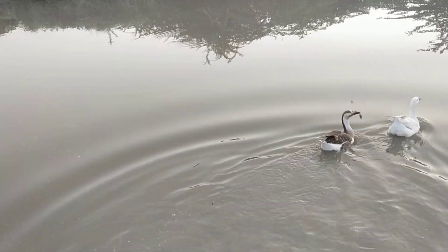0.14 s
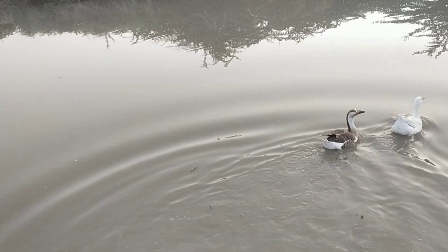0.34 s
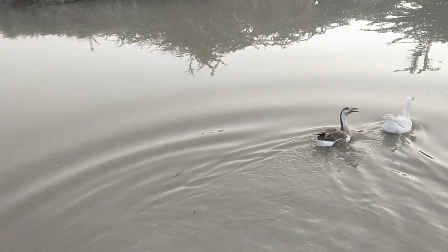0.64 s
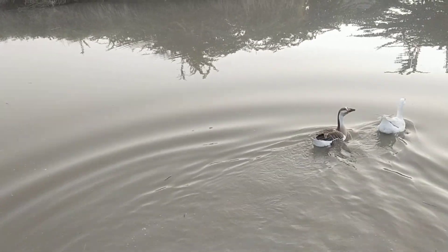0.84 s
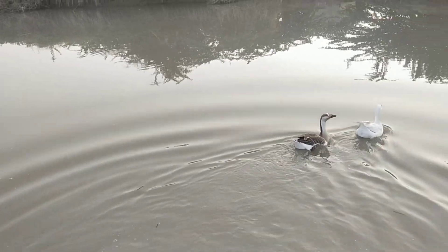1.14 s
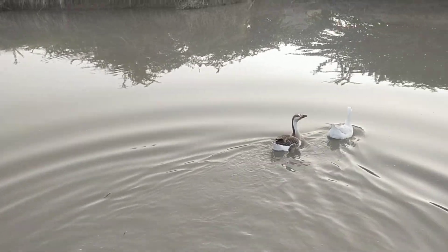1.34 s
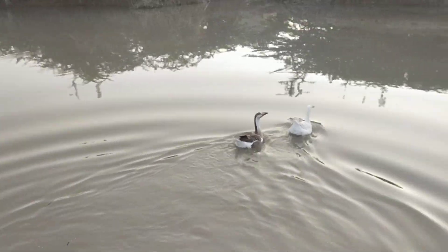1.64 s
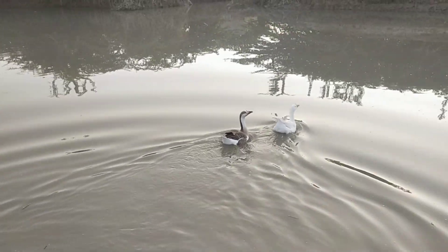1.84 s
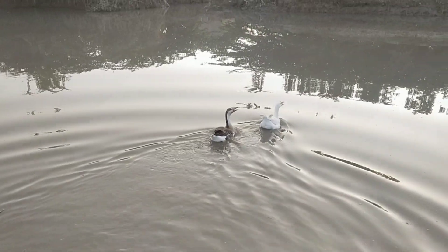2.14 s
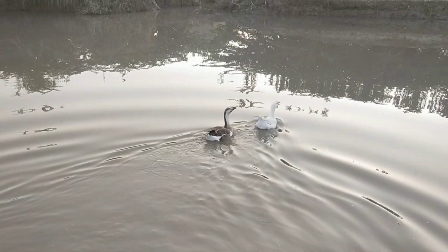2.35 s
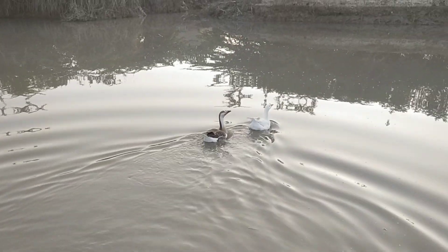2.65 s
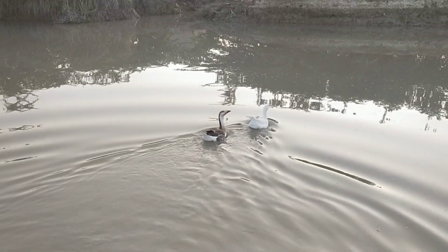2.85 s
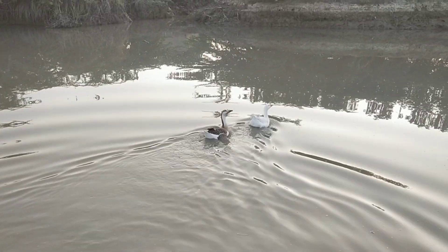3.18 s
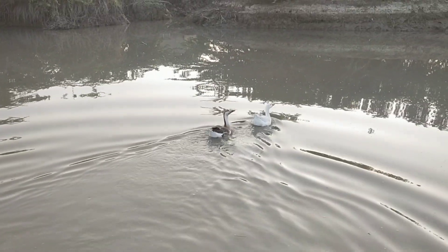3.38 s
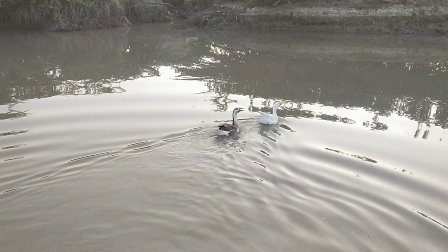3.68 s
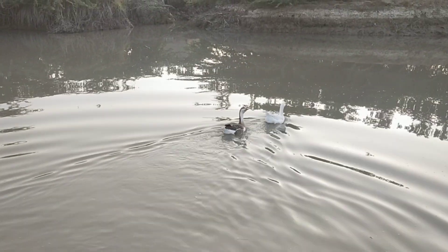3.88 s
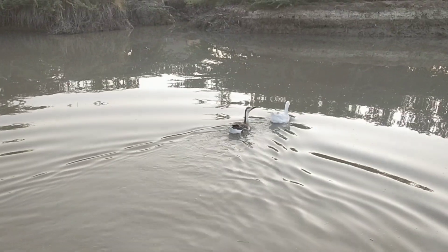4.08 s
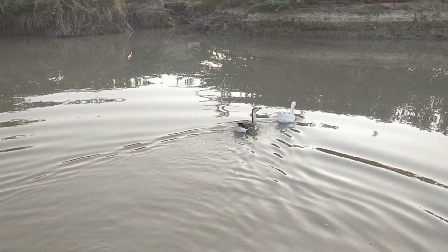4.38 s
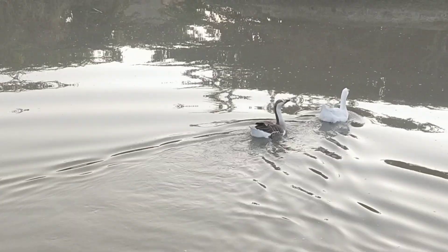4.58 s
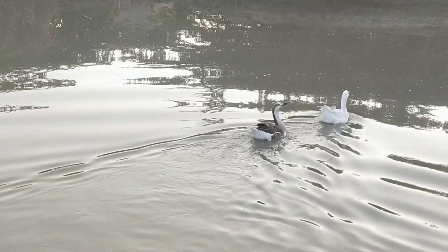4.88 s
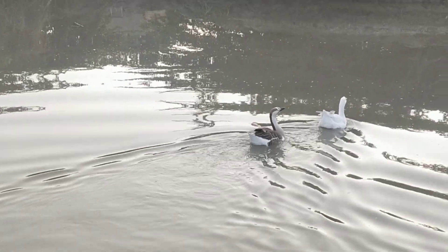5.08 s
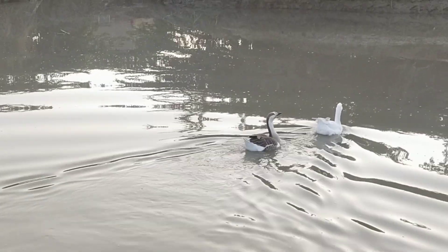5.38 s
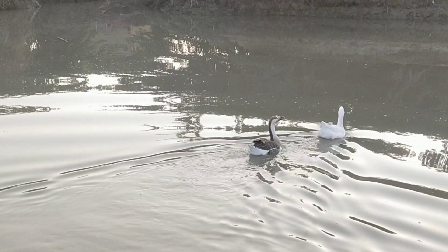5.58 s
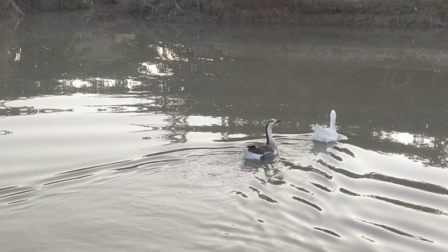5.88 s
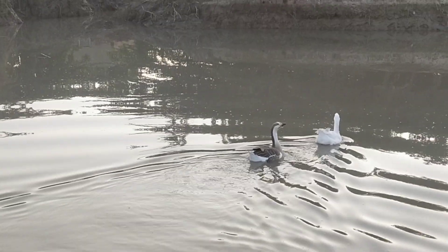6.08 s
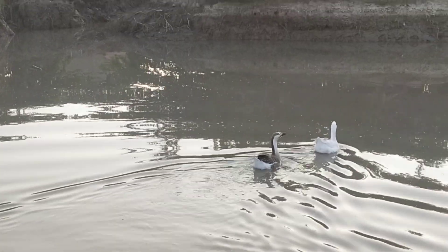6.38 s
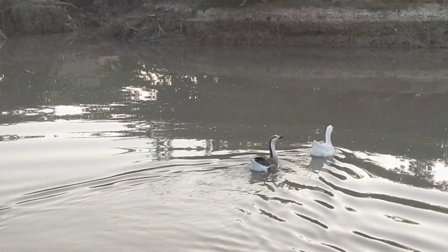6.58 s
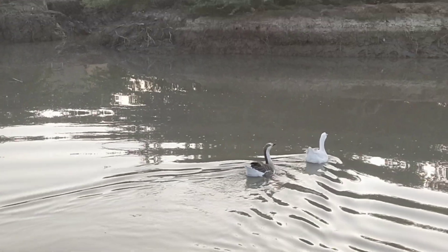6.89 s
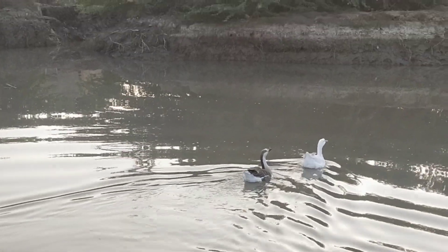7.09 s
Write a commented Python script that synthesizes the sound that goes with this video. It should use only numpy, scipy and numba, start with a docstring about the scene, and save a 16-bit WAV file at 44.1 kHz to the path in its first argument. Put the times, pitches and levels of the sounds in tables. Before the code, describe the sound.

A goose honks hoarsely while another cries high and clear, repeating every second and a half over soft open-air hush and a distant chugging engine.

```python
"""Over steady air hush and a far engine's chug, small birds chirp and a drip sounds; then two geese call together.
One honks low: its syrinx slaps shut each cycle and rings throat and bill; grunts follow. The other's clear harmonic
cry breaks upward, then sighs. Thin sliding tones follow: first a cry's faint echo, then far-off ones. Soft knocks
fall now and then; a hiss grows and stops, noise bursts crackle, light taps come after; a far whine trills at the end.
Banks and trees echo the geese and, more softly, the near sounds; the right microphone is shaded and duller."""
import sys
import numpy as np
from scipy import signal
from scipy.fft import rfft, irfft
from scipy.io import wavfile
from scipy.ndimage import uniform_filter1d, map_coordinates
from numba import njit

SR = 44100
rng = np.random.default_rng(int(sys.argv[2]) if len(sys.argv) > 2 else 0)


def to_wav(sig):
    """Store sig (one row per channel, or 1-D mono) as 16-bit WAV at the path in sys.argv[1].

    Samples outside -1..1 are clipped; the rate is SR.
    """
    pcm = np.clip(np.atleast_2d(sig), -1, 1) * 32767
    pcm = np.round(pcm).astype(np.int16)
    wavfile.write(sys.argv[1], SR, pcm.T)  # frames by channels


N = 318843
T = np.arange(N) / SR

# open-air hush, relative spectrum: f/Hz, level/dB
AIR_SPECTRUM = [(15, -53.5), (25, -12.5), (111, -0.5), (242, -2.5), (293, -9), (863, -20), (1160, -18.5),
                (1560, -25.5), (2690, -27), (6210, -37.5), (8140, -44), (12900, -38), (16000, -48.5)]
# how much weaker the right microphone hears the pond: f/Hz, level/dB
RIGHT_SHADE = [(150, 1), (600, 4.5), (1000, 8), (1400, 12), (1950, 11.5), (2500, 13.5), (3200, 24),
               (4200, 30.5), (6500, 32), (14000, 25)]
# how far the left microphone leads in phase: f/Hz, phase/rad
LEFT_LEAD = [(20, -3.5), (170, -0.43), (690, 2.09), (1460, 0.78), (2240, 2.5), (3500, -0.5), (16000, 12.5)]
# smeared echoes from the banks: delay/s, level/dB
BANK_ECHOES = [(0.021, -11.5), (.083, -21), (.2, -32)]
# exhaust resonances of the far engine: f/Hz, width/Hz, level/dB
ENGINE_MODES = [(83.5, 11, -4), (113, 73, -5), (114, 65, -11), (216, 25, -17), (412.4, 18, -10.5),
                (452.8, 44, -13)]
# thin tones, first a cry's faint echo, then far-off ones:
# t/s, swell/s, fade/s, start f/Hz, end f/Hz, peak level/dB
THIN_TONES = [(1.189, 0.07, .24, 1125, 1080, -54.5), (2.92, 1, .88, 912, 862, -70.5),
              (4.719, 0.052, 0.29, 1294, 1350, -78), (4.849, 0.095, 0.32, 2715, 2710, -85.5),
              (6.76, 0.16, 0.35, 2730, 2517, -78), (6.8, 0.16, .45, 4060, 3800, -88.5),
              (6.92, 0.19, 0.44, 4600, 4430, -89), (6.919, .17, 0.5, 7300, 7000, -89)]
# small birds: t/s, length/s, start f/Hz, middle f/Hz, end f/Hz, level/dB
CHIRPS = [(0.218, 0.031, 5300, 4930, 4630, -73), (0.268, 0.056, 5500, 6300, 5100, -82),
          (0.317, 0.044, 6450, 5950, 4800, -79.5), (1.58, 0.037, 5200, 5460, 4960, -81),
          (1.618, 0.028, 5230, 5860, 4740, -79), (1.64, 0.11, 4680, 3740, 4030, -75.5),
          (1.858, 0.19, 6050, 5100, 5340, -88), (4.583, 0.15, 5140, 5300, 5200, -79.5)]
# thin hisses that grow and stop short: t/s, length/s, end level/dB, growth/dB
HISSES = [(2.647, 0.776, -74.5, 5.5)]
# bands of the hiss: f/Hz, width/Hz, level/dB
HISS_BANDS = [(6900, 1200, 8), (12070, 3700, 11)]
# noise bursts (sharp close crackles; soft knocks and plops; narrow, bright drips):
# t/s, peak level/dB, centre f/Hz, t60/s
CRACKLES = [(3.421, -40, 8000, .012), (3.428, -23.5, 7200, .007), (3.4315, -34, 6500, .02),
            (3.437, -32, 6000, .022), (3.446, -21, 6500, .008), (3.4525, -29.5, 5500, .03),
            (3.458, -35, 11000, .04), (3.4897, -46, 3500, .02), (3.499, -47, 3200, .015),
            (6.092, -49, 4000, .012)]
KNOCKS = [(1.743, -54, 1128, 0.025), (5.867, -40.5, 487, 0.059), (6.104, -40, 360, 0.053),
          (6.537, -47, 94, 0.13)]
DRIPS = [(.046, -52, 3650, 0.02), (1.256, -42, 3800, 0.038)]
# light taps: t/s, peak level/dB
TAPS = [(4.7, -43.5), (4.708, -48.5), (4.747, -45.5)]
# ringing of the small hollow thing tapped: f/Hz, t60/s, level/dB
TAP_MODES = [(1308, 0.066, 3), (2485, 0.033, -4), (3130, .016, 2), (3470, 0.02, -0.5), (4600, .018, -6)]
# fixed resonances of the crying throat: f/Hz, level/dB
CRY_THROAT = [(400, -7), (620, 8.5), (950, -5), (1350, 4), (1900, -6.5), (2400, -4.5), (2700, -11),
              (2900, 0.5), (3150, -5), (3400, -11), (3900, -7), (4500, -28), (6600, -32.5), (8000, -26)]
# the voice dropping back to a soft low note: t/s, length/s, crest f/Hz, level/dB, brightness/dB
SIGHS = [(0.976, 0.25, 680.5, -40, 0.5), (2.379, 0.23, 655.7, -45.5, -12.5),
         (4.087, 0.245, 682.3, -42.5, -3)]
# cries: t/s, low part/s, high part/s, time from break to crest/s, low f/Hz, crest f/Hz, fall/(Hz/s),
# low level/dB, crest level/dB, fade/(dB/s), low brightness/dB, high brightness/dB, roughness/0-1,
# bill resonance f/Hz, its boost/dB, cycles per strong beat
CRIES = [ (.69, 0.1, 0.196, .058, 599.6, 982, 1400, -41, -27, 190, 13, 11, 0.01, 3920, 8, 3),
         (2.125, 0.1, 0.22, 0.047, 602.3, 941, 883, -42, -38.5, 85, 7, 8, 0.07, 2860, 2, 3),
         (3.803, 0.08, 0.228, 0.072, 587.5, 981, 1199, -37, -41, 11, 5, -4, 0.13, 2910, 5.5, 3),
         (5.369, .082, 0.33, 0.072, 601.3, 889, 498, -45, -43, 29, 2.5, 7.5, 0.7, 1740, 8, 2),
         (6.096, 0.092, 0.14, 0.029, 567.6, 948, 1295, -37, -34.5, 104, 2.5, 13.5, 0.39, 2000, 14, 3)]
# resonances of the honking throat (the first is the chest): f/Hz, width/Hz, level/dB
THROAT = [(174, 70, -13), (591, 150, -13), (970, 170, -20), (1773, 570, -8.5)]
# bill resonances that stay put (the last carries the rush of air): f/Hz, width/Hz, level/dB
BILL = [(3797, 720, 0.5), (6456, 480, -4.5), (12560, 9000, -16)]
# soft grunts, a slowing creak, and a rough, grainy tail like the last cry's echo:
# t/s, length/s, level/dB, start pitch f/Hz, end pitch f/Hz,
# main resonance f/Hz, brightness/dB, roughness/0-1, shudder/0-1
GRUNTS = [ (0.916, 0.044, -36, 220.8, 222.8, 2010, -14, 0.24, 0.34),
          (0.978, 0.054, -37.5, 219, 223, 1260, -10.5, 0.15, 0.5),
          (2.39, 0.13, -43.5, 214.7, 210.8, 1220, -5.5, 0.41, 0),
          (2.515, 0.081, -52, 218.3, 209, 1050, -9, 0.77, 0),
          (4.023, 0.044, -40.5, 209, 218.5, 2150, -15, 0.48, .3),
          (4.066, 0.058, -42.5, 216.5, 217, 1450, -16, 0.2, 0.1),
          (4.11, 0.075, -39.5, 220.5, 224.2, 1185, -10, 0.27, 0.34),
          (5.363, 0.1, -50, 204.7, 208.4, 1235, -3, 0.31, 0),
          (5.498, 0.097, -51.5, 218.7, 222, 1770, -9, 0.48, 0.1),
          (5.741, .14, -42, 142.2, 117.9, 1320, -8, 0.38, 0.26),
          (5.866, 0.088, -46, 106.7, 95.4, 1254, -8.5, 0.58, 0.36),
          (6.139, .075, -46, 196.6, 206.5, 1750, 1.5, 0.58, 0.4),
          (6.333, 0.0488, -56, 228, 207, 1680, 1.5, 0.65, 0.1),
          (6.383, 0.06, -47.5, 223.9, 211.7, 1000, -4.5, 0.54, 0.15),
          (6.435, 0.065, -50, 223.6, 212.4, 874, -7.5, 0.31, 0)]
# honks: t/s, length/s, release/s, level/dB, swell/dB, main resonance start f/Hz, end f/Hz, its sag/Hz,
# upper resonance start f/Hz, end f/Hz, time to its drop/s, its ring after the drop/dB,
# brightness start/dB, end/dB, roughness start/0-1, end/0-1, closing snap/dB,
# lowest bill resonance f/Hz, its boost/dB, top bill resonance f/Hz, its level/dB,
# low gap start f/Hz, end f/Hz, high gap f/Hz
HONKS = [ (0.514, 0.346, 0.007, -27, 8.5, 1370, 1360, 20, 4200, 3320, 0.27, -19.5, -2, -8.5, 0.65, 0.2, 7, 2640, 4.5, 5750, -8, 2280, 2400, 3720),
         (2.053, 0.316, 0.018, -29, 7, 1490, 1402, 90, 3500, 3380, .235, -4.5, -7, -8, 0.85, 0.14, 8, 2800, 1, 4400, -2, 2520, 2450, 4020),
         (3.66, 0.31, 0.007, -32, 6, 1720, 1550, 215, 3840, 3430, 0.225, -5, -.5, -4.5, 0.68, 0.36, 10.5, 2440, 1.5, 5240, -4.5, 2910, 2530, 5635),
         (5.586, 0.11, 0.15, -30.5, -10, 1390, 1554, -100, 3930, 4230, 0.06, -26.5, -3.5, -8, 0.83, 0.37, 2, 2355, 3, 6520, -4, 3040, 3120, 5480)]
# one pitch curve per honk, timed from the start of the scene: t/s, f/Hz
HONK_PITCH = [
    [(0.54, 145), (0.596, 155.5), (0.668, 149), (0.724, 157), (0.798, 156.2), (0.826, 162.6), (0.85, 157.3)],
    [(2.08, 170.7), (2.11, 175.3), (2.136, 152), (2.166, 151), (2.284, 162.9), (2.3, 173.1), (2.36, 176.1)],
    [(3.69, 167.5), (3.718, 174.1), (3.742, 153.4), (3.78, 150.5), (3.856, 159.3), (3.882, 173.6),
     (3.96, 178.2)],
    [(5.6, 141.7), (5.65, 153), (5.682, 154.3), (5.72, 142.4)],
]

TOP_HZ = 15850


def undb(db):
    """Decibels to gain."""
    return 10 ** (np.asarray(db) / 20)


def unit(x):
    """Scale to rms 1."""
    return x / np.sqrt(np.mean(x ** 2) + 1e-20)


def steady(x, size=900):
    """Hold the running rms near 1; size is the averaging length in samples."""
    power = uniform_filter1d(uniform_filter1d(x ** 2, size), size)
    return x / np.sqrt(np.abs(power) + 1e-14)


def spectrum_gain(points, hz):
    """Gain of a (f/Hz, level/dB) spectrum at any frequency."""
    f, db = np.transpose(points)
    return undb(np.interp(np.log(hz + 1), np.log(f), db))


def colour(x, points):
    """Filter by a (f/Hz, level/dB) spectrum."""
    gain = spectrum_gain(points, np.fft.rfftfreq(len(x), 1 / SR))
    return irfft(rfft(x) * gain, len(x))


@njit
def svf(x, hz, width):
    """State-variable band-pass whose centre and width may move."""
    y, band, low = np.empty(len(x)), 0., 0.
    for i in range(len(x)):
        g, k = np.tan(np.pi * hz[i] / SR), width[i] / hz[i]
        v = (band + g * (x[i] + 1e-18 - low)) / (1 + g * (g + k))
        band, low, y[i] = 2 * v - band, low + 2 * g * v, k * v
    return y


def resonate(x, hz, width):
    """A resonance with steep skirts: two equal band-passes in a row."""
    every = np.ones(len(x))
    centre = np.minimum(hz * every, TOP_HZ)
    return svf(svf(x, centre, width * every), centre, width * every)


def body(x, modes):
    """Several (f/Hz, width/Hz, level/dB) resonances side by side."""
    return sum(undb(db) * resonate(x, hz, width) for hz, width, db in modes)


def walk(n, rate):
    """Smooth random wander with spread near 1, taking rate new values a second."""
    values = rng.standard_normal(16000)
    return 1.2 * np.interp(np.arange(n) / SR * rate, np.arange(16000), values)


def clock(length):
    """Seconds since the start of a sound."""
    return np.arange(int(length * SR)) / SR


def envelope(t, attack_s, release_s):
    """Rise, hold and release."""
    rise = np.sin(np.pi / 2 * np.clip(t / attack_s, 0, 1)) ** 2
    return rise * np.clip((t[-1] - t) / release_s, 0, 1)


def glide(start, end, u):
    """Move from start to end as u goes from 0 to 1."""
    return start + (end - start) * u


def from_crest(t, crest_s, round_s=0.03):
    """Seconds away from the crest of a note, which turns over gently."""
    return np.hypot(t - crest_s, round_s) - round_s


def add(out, s, x):
    """Mix a sound in at its time."""
    i = int(s * SR)
    out[i:i + len(x)] += x[:max(N - i, 0)]


def play(sound, events):
    """Play one sound for each row of an event table."""
    out = np.zeros(N)
    for s, *row in events:
        add(out, s, sound(*row))
    return out


def air(level_db=-64.5, right_db=-4, swell_db=0.23):
    """Open-air hush: the bass is shared, the treble differs at the two microphones."""
    shared = colour(rng.standard_normal(N), [(200, -12.5), (900, -17), (3000, -28.5)])
    sides = []
    for side_db in (0, right_db):
        own = colour(rng.standard_normal(N), [(150, -17.5), (900, -1), (3000, 0.5)])
        sides.append(undb(side_db) * unit(colour(shared + own, AIR_SPECTRUM)))
    return np.array(sides) * undb(level_db + swell_db * walk(N, 2.8))


def microphones(left, right):
    """The right microphone is shaded and shifted in phase; the split is scaled by its mean magnitude."""
    hz = np.fft.rfftfreq(N, 1 / SR)
    lead_hz, radians = np.transpose(LEFT_LEAD)
    ratio = spectrum_gain(RIGHT_SHADE, hz)
    late = np.exp(-1j * np.interp(hz, lead_hz, radians))
    both = np.abs(ratio + late) / 2
    return np.array([irfft(rfft(left) * ratio / both, N), irfft(rfft(right) * late / both, N)])


def banks(x, t60=0.94, treble_t60=1.15, tail_db=-15.0, smear_s=0.0075):
    """The banks throw back a few smeared echoes; the trees scatter a thin tail whose pitch blurs."""
    t = T[:SR]
    low = colour(rng.standard_normal(SR), [(2000, 2), (5000, -15.5)])
    high = colour(rng.standard_normal(SR), [(1700, -30.0), (4000, 3.0)])
    low = low * np.exp(-np.log(1000) * t / t60)
    high = high * np.exp(-np.log(1000) * t / treble_t60)
    scatter = undb(tail_db) * unit((low + high) * np.minimum(t / 0.004, 1))
    echoes = np.zeros(SR)
    for delay, db in BANK_ECHOES:
        smear = (t > delay) * np.exp(-np.abs(t - delay) / smear_s)
        echoes += undb(db) * unit(smear * rng.standard_normal(SR))
    early, tail = (signal.fftconvolve(x, response / np.sqrt(SR))[:N] for response in (echoes, scatter))
    # the scattered paths keep changing length
    blur_s = 0.00022 * walk(N, 170)
    return early + map_coordinates(tail, [(T + blur_s) * SR], order=3, mode="nearest")


def engine(firing_hz=21.15, level_db=-63, unevenness=0.1, scatter_db=3, rumble=1.0):
    """Slow, uneven firings of a far engine; only the low exhaust resonances carry."""
    turns = np.floor(np.cumsum(firing_hz * (1 + unevenness * walk(N, 18))) / SR)
    firings = unit(np.diff(turns, prepend=0) * undb(scatter_db * walk(N, 58)))
    return undb(level_db) * unit(body(firings + rumble * rng.standard_normal(N), ENGINE_MODES))


def thin_tone(t, hz, db, waver=0.012, unsteady=1):
    """A thin tone made unsteady in pitch and level by the air on its way."""
    phase = 2 * np.pi * np.cumsum(hz * (1 + waver * walk(len(t), 90))) / SR
    flicker_db = 3.5 * unsteady * walk(len(t), 28)
    return undb(db + flicker_db) * np.sqrt(2) * np.sin(phase)


def drifting_tone(swell_s, fade_s, hz0, hz1, db, swell_db=4.5, waver_hz=14):
    """A thin tone swells and fades as it slides in pitch."""
    t = clock(swell_s + fade_s)
    away = np.maximum(1 - t / swell_s, (t - swell_s) / fade_s)
    tone = thin_tone(t, glide(hz0, hz1, t / t[-1]), db - swell_db * away, waver=waver_hz / hz0)
    return envelope(t, attack_s=0.013, release_s=fade_s / 2) * tone


def whine(start_s=6.58, trill_hz=91, depth=0.7):
    """A far tone, chopped by a fast trill, scoops up, then sags and fades."""
    rise_s, scoop_hz, sag_hz_per_s, fade_db_per_s = 0.17, 165, 180, 12
    t = np.maximum(T - start_s, 0)
    hz = 1681 - scoop_hz * np.exp(-t / rise_s) - sag_hz_per_s * t
    tone = thin_tone(t, hz, -58 - fade_db_per_s * t, waver=0.006, unsteady=0.36)
    trill = 1 + depth * np.cos(2 * np.pi * trill_hz * t)
    return np.sqrt(np.minimum(t / rise_s, 1)) * tone * trill


def chirp(length, start_hz, middle_hz, end_hz, db, raspiness=0.6):
    """A small bird's faint whistle curves through three pitches."""
    t = clock(length)
    curve = np.polyfit([-1, 0, 1], [start_hz, middle_hz, end_hz], 2)
    whistle = thin_tone(t, np.polyval(curve, 2 * t / length - 1), db, waver=0.0107)
    return envelope(t, attack_s=0.006, release_s=0.0028) * whistle * (1 + raspiness * walk(len(t), 500))


def hiss(length, db, growth_db):
    """A thin, high band of noise grows and stops short."""
    t = clock(length)
    noise = unit(body(rng.standard_normal(len(t)), HISS_BANDS))
    return envelope(t, attack_s=0.04, release_s=0.017) * undb(db + growth_db * (t / length - 1.0)) * noise


def bursts(events, spread):
    """Short decaying bursts of noise, each in its own band; spread is bandwidth over centre."""
    out, t = np.zeros(N), T[:SR // 6]
    for s, db, hz, t60 in events:
        decaying = rng.standard_normal(len(t)) * np.exp(-np.log(1000) * t / t60)
        x = resonate(decaying, hz, spread * hz)
        add(out, s, undb(db) * x / np.abs(x).max())
    return out


def tap(db):
    """A light tap on something small and hollow: a few decaying modes."""
    t = clock(.15)
    ring = sum(undb(mode_db - 60 * t / t60) * np.sin(2 * np.pi * hz * t) for hz, t60, mode_db in TAP_MODES)
    return undb(db) * ring / np.abs(ring).max()


def clear_voice(t, hz, db, bright_db, rough, ring_hz, ring_db, beat_cycles=3,
                jitter=0.0055, flutter=0.61, hiss_db=-16, count=7):
    """A clear harmonic tone; roughness makes every second or third cycle beat, adding lines between harmonics."""
    n = len(t)
    phase = 2 * np.pi * np.cumsum(hz * (1 + jitter * (1 + rough) * walk(n, 400))) / SR
    tone = np.zeros(n)
    for k in range(1, count + 1):
        # brightness grows from 700 Hz to its full amount two octaves up
        push = undb(bright_db * np.clip(np.log(k * hz / 700) / np.log(4), 0, 1))
        shiver = undb(1.2 * np.sqrt(k) * walk(n, 70))
        ring = undb(ring_db * np.exp(-((k * hz - ring_hz) / 260) ** 2))  # the bill
        tone += spectrum_gain(CRY_THROAT, k * hz) * ring * push * shiver * np.sin(k * phase)
    beat = 1 + flutter * rough * (np.cos(phase / beat_cycles) + 0.35 * walk(n, 500))
    breath = unit(body(colour(rng.standard_normal(n), [(4000, -8.0), (12000, -10)]), BILL))
    breath = breath * undb(hiss_db + bright_db / 2) * np.sqrt(np.abs(rough))
    return undb(db) * steady(steady(tone) * beat + breath)


def sigh(length, crest_hz, db, bright_db):
    """A soft, flat arch of the clear voice in its low register; the bill picks out one overtone."""
    fall_hz_per_s, fade_db_per_s = 580, 116
    t = clock(length)
    away = from_crest(t, crest_s=0.088)
    voice = clear_voice(t, crest_hz - fall_hz_per_s * away, db - fade_db_per_s * away, bright_db,
                        rough=0.16, ring_hz=3396, ring_db=12.5)
    return envelope(t, attack_s=0.035, release_s=0.02) * voice


def cry(low_s, high_s, crest_s, low_hz, crest_hz, fall, low_db, crest_db, fade,
        low_bright, high_bright, rough, ring_hz, ring_db, beat_cycles):
    """A climbing low note breaks up by about a fifth; pitch and level then arch over together."""
    climb_hz_per_s, break_s = 580, 0.0035
    t = clock(low_s + high_s)
    broken = .5 + .5 * np.tanh((t - low_s) / break_s)
    # the voice rasps where it breaks and roughens as it runs out
    crack = 0.3 * np.exp(-((t - low_s) / 0.003) ** 2)
    fray = 0.25 * np.clip(2 * (t - low_s) / high_s - 1, 0, 1)
    away = from_crest(t, low_s + crest_s)
    hz = glide(low_hz + climb_hz_per_s * t, crest_hz - fall * away, broken)
    db = glide(low_db, crest_db - fade * away, broken)
    bright_db = glide(low_bright, high_bright, broken)
    voice = clear_voice(t, hz, db, bright_db, rough + crack + fray, ring_hz, ring_db, beat_cycles)
    return envelope(t, attack_s=0.055, release_s=0.013) * voice


def gap(x, hz, width_hz=440, depth=0.62):
    """A side cavity of the throat swallows one band."""
    every = np.ones(len(x))
    for _ in range(2):
        x = x - depth * svf(x, hz * every, width_hz * every)
    return x


def rasp(t, hz, db, main_hz, bright_db, upper_hz, rough, gaps_hz, ring=0, bill_hz=2500, bill_db=0,
         top_hz=5500, top_db=-12, clear_width_hz=100, rough_width_hz=620, upper_width_hz=900, top_width_hz=500):
    """The syrinx slaps shut once a cycle and a puff of air follows; both ring the throat and the bill."""
    jitter, shimmer_db, low_rasp, high_rasp, open_share = .036, 2.6, .9, 1.9, .42
    n = len(t)
    cycles = np.cumsum(hz * (1 + jitter * rough * walk(n, 170.64))) / SR
    offset = ((cycles + .5) % 1 - .5) * SR / hz  # samples from the nearest slap
    pulses = np.sinc(offset) * np.exp(-(offset / 6) ** 2)
    slaps = unit(pulses * undb(shimmer_db * rough * walk(n, 170)))
    puffs = rough * unit(np.exp(-(cycles % 1) / open_share) * rng.standard_normal(n))
    soft = slaps + low_rasp * puffs
    # each slap rattles along the windpipe, which smears it and makes the overtones uneven
    windpipe = rng.standard_normal(SR // 100) * np.exp(-T[:SR // 100] / .0022)
    rattle = unit(signal.fftconvolve(slaps, windpipe)[:n])
    # the top is mostly rushing air
    harsh = colour(rattle, [(4000, 7.0), (8000, -12.0)]) + high_rasp * puffs
    # a leaky, rough syrinx damps the resonances; a tight one lets them ring narrow and tall
    width = clear_width_hz + rough_width_hz * rough
    upper_width = clear_width_hz + upper_width_hz * rough
    tall = 450 / width
    # the resonances wander a little
    main_hz, upper_hz, bill_hz = (f * (1 + 0.014 * walk(n, 120)) for f in (main_hz, upper_hz, bill_hz))
    throat = tall * resonate(soft, main_hz, width)
    throat = throat + body(rattle + low_rasp * puffs, THROAT[1:]) + body(slaps, THROAT[:1])
    bill = tall * resonate(harsh, upper_hz, upper_width) + body(harsh, BILL[:-1])
    bill = bill + undb(3.5 + bill_db) * resonate(harsh, bill_hz, 270)
    bill = bill + undb(top_db) * resonate(harsh, top_hz, top_width_hz)
    # the louder the call, the more air rushes through the bill
    rush = undb(0.86 * (db + 32.5)) * body(harsh, BILL[-1:])
    squeal = ring * steady(resonate(soft, upper_hz, 180))
    for gap_hz in gaps_hz:
        throat, bill = gap(throat, gap_hz), gap(bill, gap_hz)
    return undb(db) * (steady(throat) + undb(bright_db) * steady(bill + rush) + squeal)


def grunt(length, db, hz0, hz1, main_hz, bright_db, rough, shudder):
    """One short, rounded stretch of the rasping voice; a slack syrinx shudders in coarse pulses."""
    t = clock(length)
    u = t / length
    shudder_hz = 44.5 * (1 + .2 * walk(len(t), 40))
    pulsing = 1 + shudder * np.cos(2 * np.pi * np.cumsum(shudder_hz) / SR)
    voice = rasp(t, glide(hz0, hz1, u), db, main_hz, bright_db, upper_hz=3450, rough=rough, gaps_hz=[2800])
    return np.sin(np.pi * u) ** 0.97 * pulsing * voice


def honk(pitch, length, release, db, swell_db, main0, main1, sag_hz, upper0, upper1, drop_s, ring_db,
         bright0, bright1, rough0, rough1, snap_db, bill_hz, bill_db, top_hz, top_db, gap0, gap1, high_gap_hz):
    """A honk's level and roughness shift as the goose pushes; resonances and gaps slide, and it snaps shut."""
    clearing_s, upper_drop_s, snap_s = 0.1, 0.012, 0.012
    t = clock(length + release)
    u = np.minimum(t / length, 1)
    closing = np.sin(np.pi * u)
    # the bill half closes in mid-call, which dulls it by 2 dB; the end is a harsh snap
    snap = snap_db * np.exp(-((t - length) / snap_s) ** 2)
    bright_db = glide(bright0, bright1, u) - 2 * closing + snap
    dropped = .5 + .5 * np.tanh((t - drop_s) / upper_drop_s)
    rough = glide(rough1, rough0, np.exp(-t / clearing_s))
    main_hz = glide(main0, main1, u) - sag_hz * closing
    gaps_hz = [glide(gap0, gap1, u ** 2), high_gap_hz]
    voice = rasp(t, np.interp(t, *pitch.T), db + swell_db * (u - .5), main_hz, bright_db,
                 glide(upper0, upper1, dropped), rough, gaps_hz, dropped * undb(ring_db),
                 bill_hz + 180 * u ** 2, bill_db, top_hz, top_db)
    attack = np.clip(t / 0.071, 0, 1) ** 1.39
    return voice * attack * np.clip((t[-1] - t) / release, 0, 1) ** 2


def honks():
    """Each honk follows its own pitch curve, shifted to start with it."""
    rows = []
    for (s, *row), pitch in zip(HONKS, HONK_PITCH):
        rows.append((s, np.array(pitch) - (s, 0), *row))
    return play(honk, rows)


def scene():
    """Geese and faint sounds over the water, small noises close by."""
    faint = engine() + play(drifting_tone, THIN_TONES) + whine() + play(chirp, CHIRPS)
    near = bursts(CRACKLES, spread=2.1) + bursts(KNOCKS, spread=1.2) + bursts(DRIPS, spread=0.3)
    near = near + play(tap, TAPS) + play(hiss, HISSES)
    geese = play(sigh, SIGHS) + play(cry, CRIES) + play(grunt, GRUNTS) + honks()
    direct = geese + faint + near
    echoing = geese + undb(-10.0) * near
    # each microphone hears its own scatter
    left = direct + banks(echoing)
    right = direct + undb(3.5) * banks(echoing)
    return microphones(left, right) + air()


def record(dry):
    """The recorder cuts the top with a steep low-pass."""
    low_pass = signal.ellip(10, .05, 60, TOP_HZ, fs=SR, output="sos")
    return signal.sosfiltfilt(low_pass, dry)


dry = scene()
out = record(dry)
to_wav(out)
```